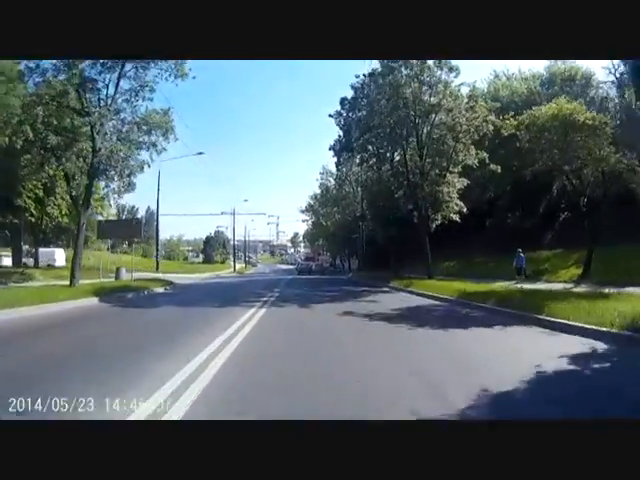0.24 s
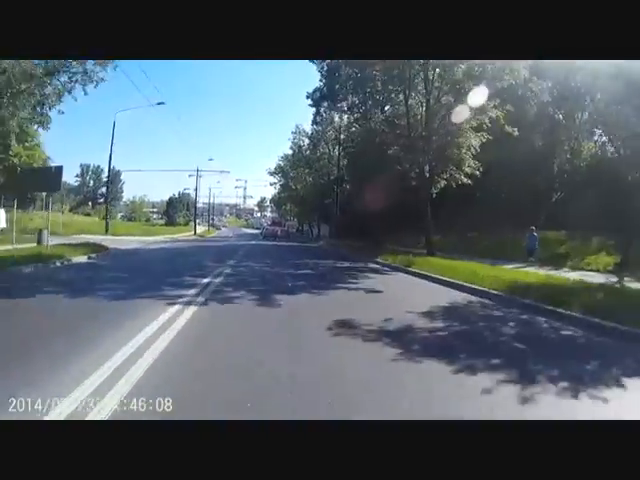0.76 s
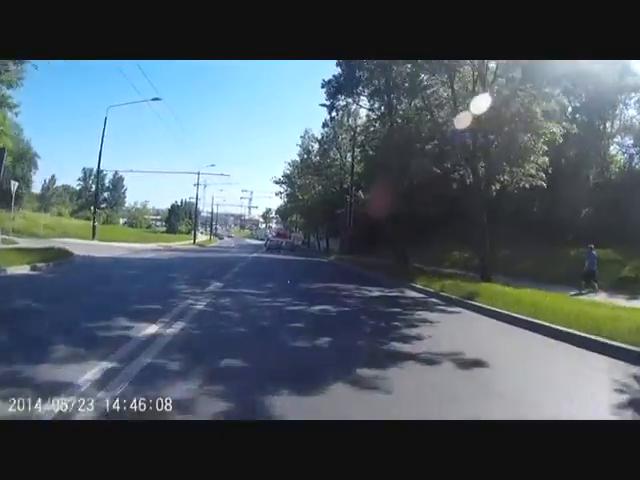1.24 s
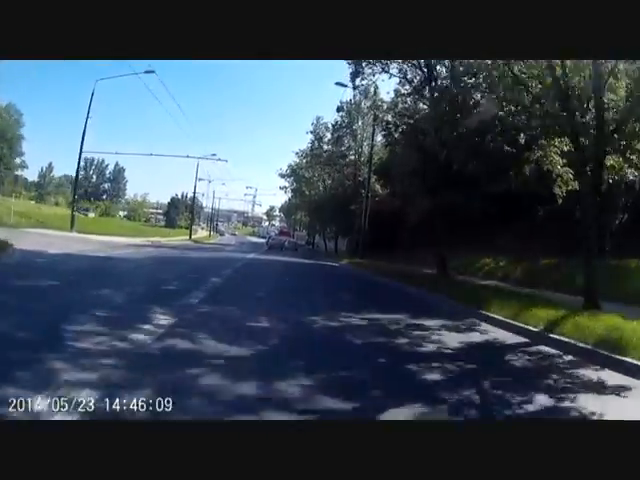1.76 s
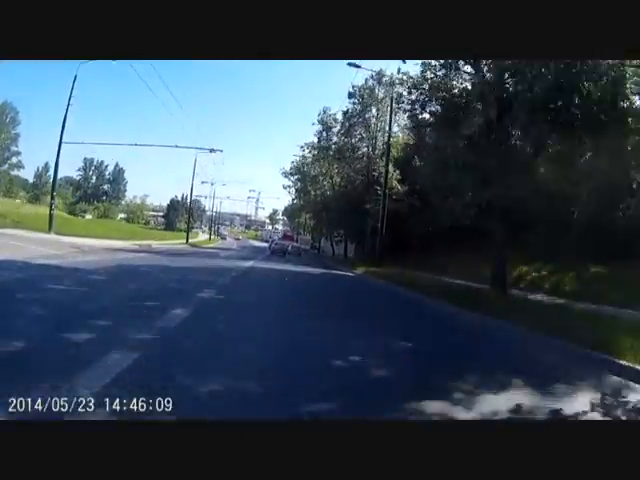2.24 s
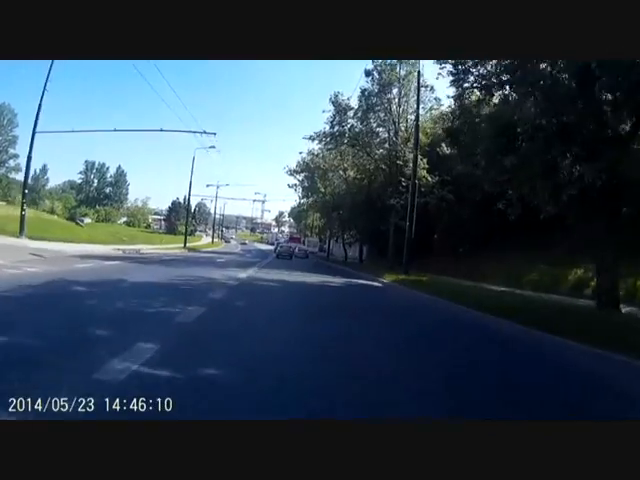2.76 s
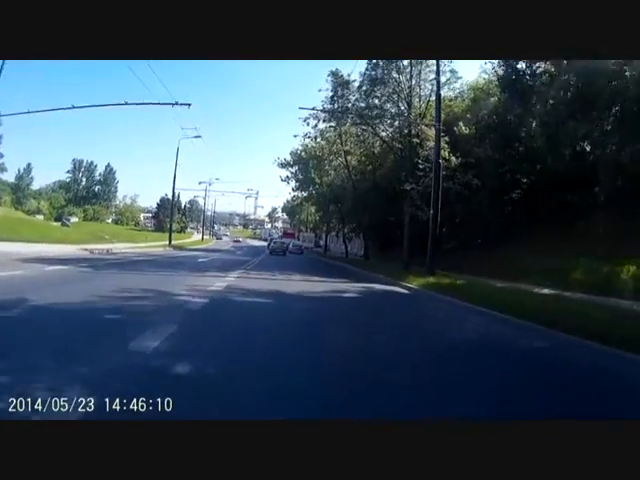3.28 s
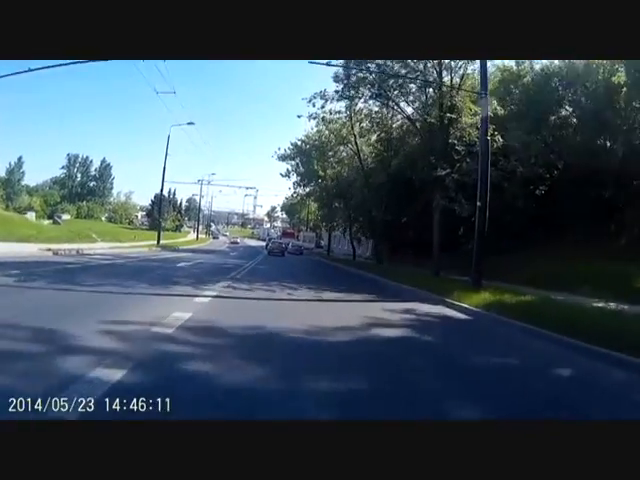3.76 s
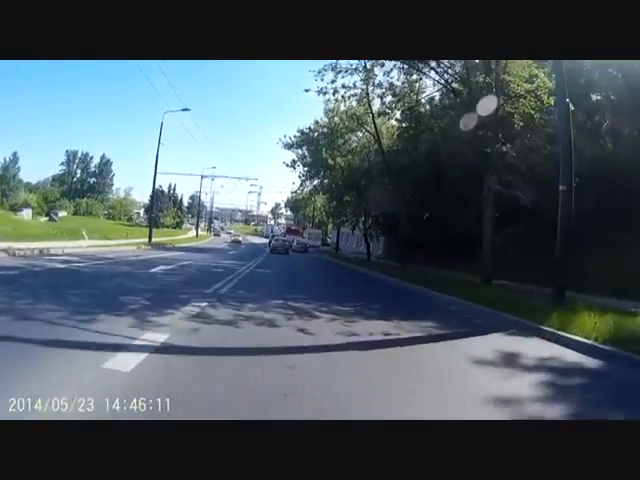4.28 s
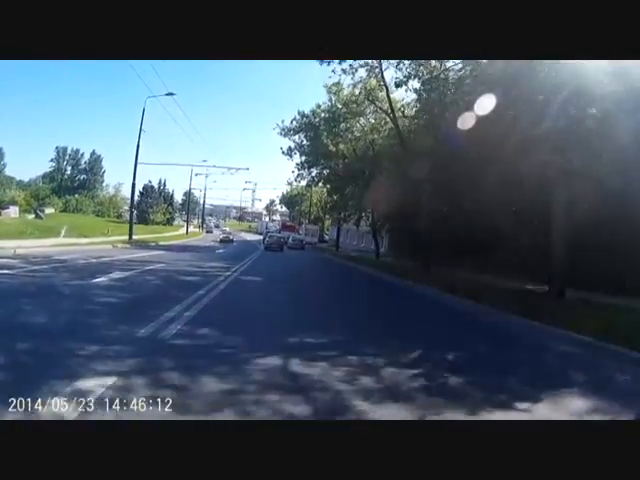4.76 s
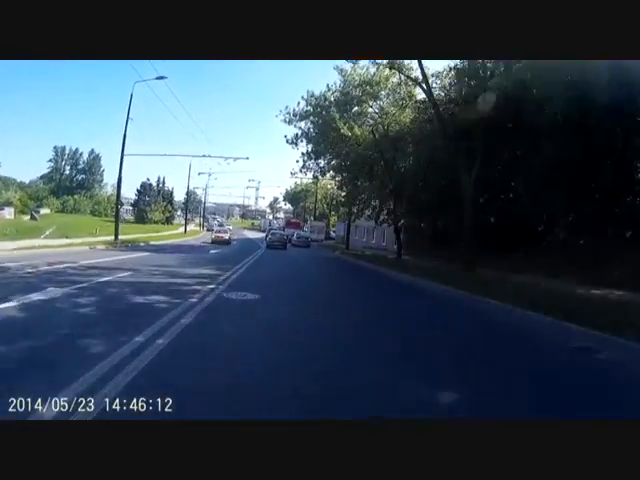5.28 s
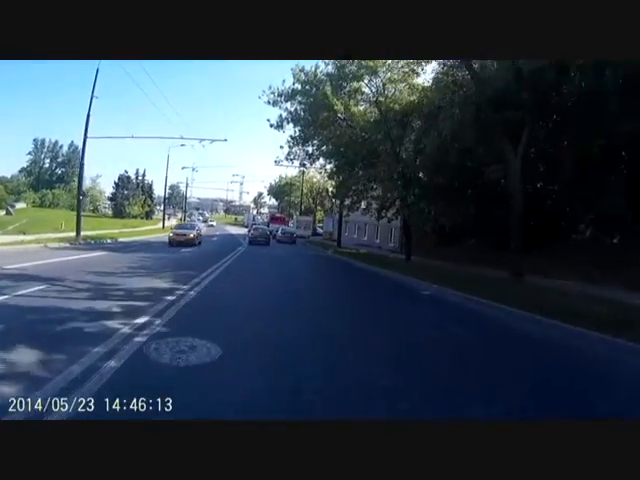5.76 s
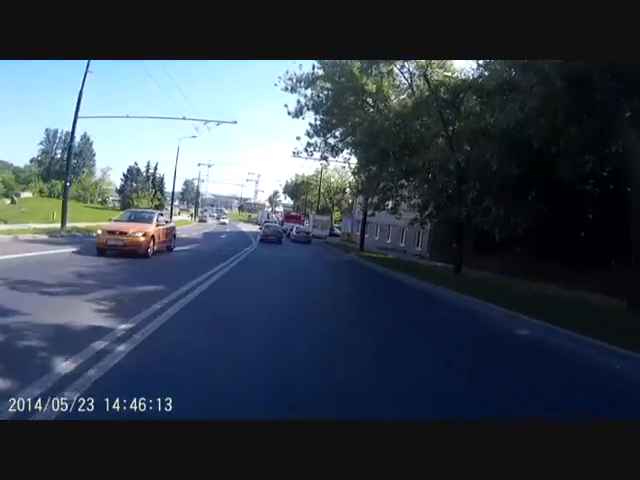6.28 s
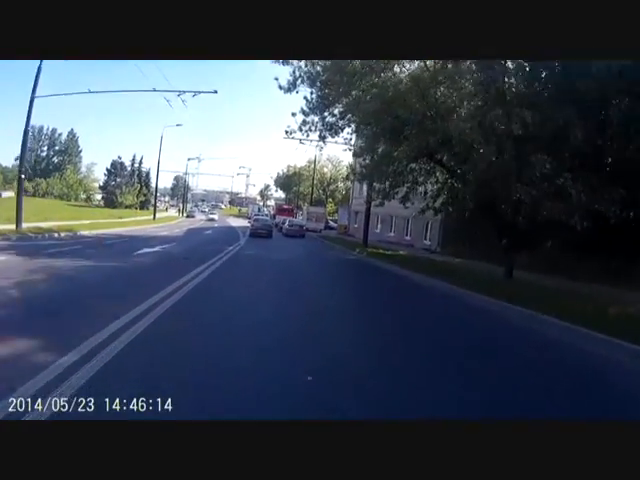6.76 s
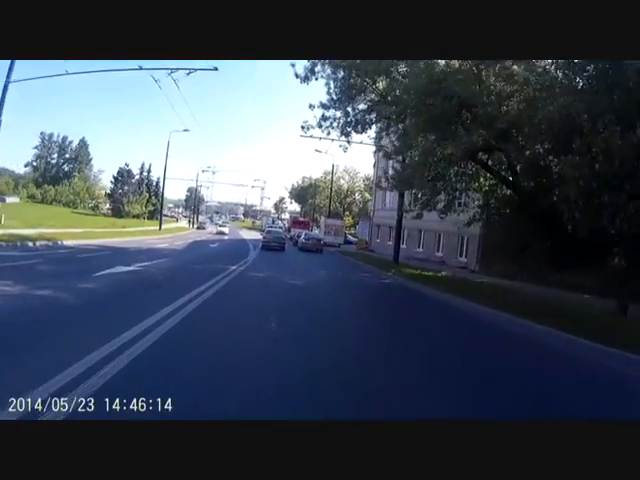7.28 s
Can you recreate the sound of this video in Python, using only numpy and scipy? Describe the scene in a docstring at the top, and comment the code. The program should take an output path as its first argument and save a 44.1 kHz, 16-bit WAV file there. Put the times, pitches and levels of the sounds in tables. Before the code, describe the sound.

Bike-mounted microphone: shrill, rough tyre whine over soft rumble grows louder, with stone pings, a sharp clack and an oncoming car sweeping past.

```python
"""A high hum near 1.5 kHz comes first and swells later: tyres on asphalt ring a camera's hard case on a bicycle.
Contact noise drives the case resonances; stones add decaying pings, and shaped noise gives roar, hiss and rumble.
The frame thumps in short low pulses; loose parts rattle, tick, squeak and give one sharp, modal clack.
Late on, a car passes the other way: hum that follows its distance, with tyre sizzle while alongside.
Two very faint whistles of the camera's electronics run throughout."""
import sys
import numpy as np
from scipy.fft import rfft, irfft, next_fast_len
from scipy.io import wavfile
from scipy.ndimage import map_coordinates

SR = 44100
rng = np.random.default_rng(int(sys.argv[2]) if len(sys.argv) > 2 else 0)


def put_to_file(sound):
    """Save the sound as 16-bit audio at rate SR, in the file named by the first command-line argument."""
    columns = np.atleast_2d(sound).T  # one column per channel
    safe = np.clip(columns, -1, 1)
    whole_steps = np.round(safe * 32767)
    wavfile.write(sys.argv[1], SR, whole_steps.astype(np.int16))


N = 332205

# Drive of the tread by speed and surface: (time [s], strength [dB])
ROLL_STRENGTH = [(0.0, -49), (0.12, -41.5), (0.2, -48), (0.67, -45), (0.83, -51), (1.44, -45.5),
                 (1.51, -39), (1.64, -46.5), (1.94, -39.0), (2.47, -46), (2.59, -38.5), (2.86, -45),
                 (3.32, -39.5), (3.68, -47), (3.79, -39), (4.09, -41.5), (4.15, -33), (4.57, -46.5),
                 (4.88, -34), (4.93, -37.5), (5.24, -30), (6.08, -33.5), (6.73, -30), (7.17, -36),
                 (7.36, -33), (7.53, -36)]
# Main, wall and upper resonances of the case: (centre [Hz], width [Hz], relative level [dB])
CASE_MODES = [(1428, 107, -2.5), (1513, 143, -1.5), (1676, 207, -6)]
WALL_MODES = [(511, 70, -5), (799, 45, 1), (1125, 36, -2.5)]
UPPER_MODES = [(2944, 73, 1.5), (3560, 110, -10), (3890, 240, -13.5), (4410, 470, -15)]
# Filter on the case hum: (frequency [Hz], gain [dB])
HUM_FILTER = [(600, -39), (1000, -5), (1300, -1), (1450, 5), (1780, -2), (2000, -9.5), (2500, -22.5),
              (4000, -46)]
# Spectra of rasp, roar, hiss, deep rumble and frame drumming: (frequency [Hz], relative density [dB per Hz])
RASP_SPECTRUM = [(1200, -32), (2000, -6), (2450, 1), (3200, -3), (4000, -1.5), (4700, -5), (5000, -8.5),
                 (6500, -8), (10000, -40)]
ROAR_SPECTRUM = [(40, -11.5), (100, 0.5), (170, 1), (300, 0), (450, -2.5), (680, -7), (1000, -10),
                 (2000, -13), (4000, -54)]
HISS_SPECTRUM = [(1500, -0.5), (4000, -7.5), (5600, 2), (7000, 1), (8700, 0), (10500, 0), (12400, -0.5),
                 (13200, -0.5), (15000, -4.5), (15800, -7)]
RUMBLE_SPECTRUM = [(8, -24), (20, -4), (29, 0), (36, -4.5), (50, -10.5), (70, -24), (200, -55)]
DRUM_SPECTRUM = [(40, -30), (60, -3), (73, -0.5), (88, -2), (105, -10.5), (130, -19), (300, -43)]
# Coarse stones under the tyre: (time [s], relative level [dB])
STONE_HITS = [(1.929, -23.5), (2.574, -26), (2.9607, -27), (4.344, -27), (5.0866, -24), (5.233, -17),
              (6.2428, -13), (7.013, -13)]
# Slow heaving of the frame: (time [s], deep rumble level [dB])
HEAVE_LEVEL = [(0, -57), (.75, -62), (1.1, -55), (1.9, -45.5), (2.4, -51), (3.6, -53.5), (4.3, -47.5),
               (5.2, -55.5), (6.1, -53), (7.1, -44), (7.53, -48.5)]
# Jolts of the frame, and the low thump of the mount's clack at 6.63 s: (time [s], peak level [dB], frequency
# [Hz], Gaussian sigma [s])
FRAME_BUMPS = [(.288, -35.5, 84.6, 0.0064), (0.347, -31.5, 45.4, 0.0086), (.389, -44, 150, 0.011),
               (6.276, -26, 53, 0.0043), (6.628, -25, 133, 0.0018)]
# Ticks of the mount: (time [s], relative level [dB])
MOUNT_TICKS = [(.178, -40.5), (.422, -29.5), (6.4385, -30)]
# Filter on the ticks: (frequency [Hz], gain [dB])
TICK_FILTER = [(100, -12), (500, 2.5), (1000, 7), (2500, -3), (4000, -5), (5500, -19), (12000, -23),
               (16000, -32)]
# Clack of the mount: (time [s], relative level [dB])
MOUNT_CLACKS = [(6.6281, -9)]
# Modes of the clack: (frequency [Hz], relative level [dB], t60 [s])
CLACK_RESONANCES = [(630, -5, 0.012), (1630, 5.5, 0.017), (2080, -3.5, 0.013), (3230, 1.5, 0.0038),
                    (3740, -6, 0.0039)]
# Rattles of loose parts: (time [s], level at the peak [dB], Gaussian sigma [s])
RATTLE_BURSTS = [(0.184, -48, .004), (0.341, -49, 0.0091), (.392, -49, 0.015), (0.456, -48.5, 0.012),
                 (6.288, -38, 0.0049), (6.438, -40, 0.006)]
# Spectrum of the rattles: (frequency [Hz], relative density [dB per Hz])
RATTLE_SPECTRUM = [(60, -15), (140, 3), (300, -3.5), (560, 0), (750, -2), (1100, -15), (2500, -16),
                   (6000, -36)]
# Sizzle of the passing car's tyres: (centre [Hz], width [Hz], relative level [dB])
SIZZLE_MODES = [(4550, 260, 7), (7400, 490, 4), (9900, 550, 2), (11400, 600, -2), (13100, 500, -4)]
# Hiss limits, before road patches shift it: (lowest level [dB], highest level [dB])
HISS_LIMITS_DB = (-69.5, -60.5)

TOP_HZ = 15800
CRUISE_DB = -40
# Base levels at cruising strength
HUM_DB, WALLS_DB, RASP_DB, ROAR_DB, HISS_DB, DRUM_DB = -43.5, -56, -58, -54.5, -66.5, -56.5
# Layer gain per gain of strength [dB per dB]
HUM_DB_PER_DB, WALLS_DB_PER_DB, RASP_DB_PER_DB = 1.065, 0.78, 0.94
ROAR_DB_PER_DB, HISS_DB_PER_DB, DRUM_DB_PER_DB = 0.42, 0.65, 0.18
# Car: time alongside, nearest distance, closing speed, hum level alongside
CAR_S, CAR_GAP_M, CAR_M_PER_S, CAR_DB = 6.73, 5.03, 21.5, -28


def tyres(surface_db):
    """Tread on coarse asphalt rings the case: a high hum with a rasp above it."""
    hum = amp(HUM_DB + effort_db(HUM_DB_PER_DB)) * case_hum()
    walls = amp(WALLS_DB + effort_db(WALLS_DB_PER_DB)) * ringing(WALL_MODES, spread_db=2)
    rasp_db = RASP_DB + effort_db(RASP_DB_PER_DB)
    rasp = amp(rasp_db - 1.0) * ringing(UPPER_MODES, spread_db=2.8)
    rasp += amp(rasp_db - 4.0) * noise(RASP_SPECTRUM)
    return amp(surface_db) * (hum + walls + lowpass(rasp, 5600))


def case_hum():
    """Contact noise through the main resonances of the case; rms 1."""
    return unit(coloured(ringing(CASE_MODES, spread_db=1.5), HUM_FILTER))


def effort_db(db_per_db):
    """Layer gain relative to cruising, following the rolling strength."""
    strength_db, = curves(ROLL_STRENGTH)
    return db_per_db * (strength_db - CRUISE_DB)


def stones(hz=1500, t60_s=0.03, attack_s=0.00082):
    """A coarse stone kicks the main resonance of the case into a brief ping."""
    out = np.zeros(N + SR)
    t = np.arange(SR // 10) / SR
    for s, db in STONE_HITS:
        decay = amp(db - 3.0 - 60 * t / t60_s)
        ping = decay * (1 - np.exp(-t / attack_s)) * np.sin(2 * np.pi * hz * t)
        out[round(s * SR):][:len(t)] += ping
    return out[:N]


def rush(surface_db, sway_db=1.0):
    """Dull road roar and thin air hiss swell with the tyres, but less steeply."""
    roar_db = ROAR_DB + effort_db(ROAR_DB_PER_DB) + 0.57 * surface_db + sway_db * wobble(11)
    hiss_db = np.clip(HISS_DB + effort_db(HISS_DB_PER_DB), *HISS_LIMITS_DB) + 0.67 * surface_db
    return amp(roar_db) * noise(ROAR_SPECTRUM) + amp(hiss_db) * noise(HISS_SPECTRUM)


def frame():
    """The frame rumbles and drums all the way; each bump gives it a soft low push, and the mount's clack a low
    thump."""
    rumble_db, = curves(HEAVE_LEVEL)
    out = amp(rumble_db) * noise(RUMBLE_SPECTRUM)
    out += amp(DRUM_DB + effort_db(DRUM_DB_PER_DB)) * noise(DRUM_SPECTRUM)
    for s, db, hz, sigma_s in FRAME_BUMPS:
        out -= amp(db) * bell(s, sigma_s) * np.cos(2 * np.pi * hz * (clock() - s))
    return out


def passing_car(span_s=0.14, sizzle_db=-60):
    """Car tyres ring the case, fading with distance; their sizzle is heard only near the closest point."""
    t = clock() - CAR_S
    nearness = CAR_GAP_M / np.hypot(CAR_GAP_M, CAR_M_PER_S * t)
    alongside = 1 / (1 + (t / span_s) ** 8)
    hum = amp(CAR_DB) * nearness * case_hum()
    sizzle = amp(sizzle_db) * alongside * ringing(SIZZLE_MODES, spread_db=3)
    return hum + sizzle


def mount(settle=0.085):
    """Play in the mount: dry ticks of decaying noise and one hard clack of decaying modes."""
    ticks, clacks = np.zeros(N + SR), np.zeros(N + SR)
    t = np.arange(SR // 8) / SR
    for s, db in MOUNT_TICKS:
        decay = amp(db + 3.0 - 60 * t / 0.015)  # t60 15 ms
        ticks[round(s * SR):][:len(t)] += decay * rng.standard_normal(len(t))
    ring = np.zeros(len(t))
    for hz, db, t60_s in CLACK_RESONANCES:
        # longer-ringing modes build up more slowly
        attack = 1 - np.exp(-t / (settle * t60_s))
        ring += amp(db - 60 * t / t60_s) * attack * np.sin(2 * np.pi * hz * t)
    for s, db in MOUNT_CLACKS:
        clacks[round(s * SR):][:len(t)] += amp(db + 3) * ring
    return coloured(ticks[:N], TICK_FILTER) + lowpass(clacks[:N], 5500)


def rattles():
    """Loose parts of the bicycle chatter in short bursts of noise."""
    envelope = sum(amp(db) * bell(s, sigma_s) for s, db, sigma_s in RATTLE_BURSTS)
    return noise(RATTLE_SPECTRUM) * envelope


def squeak(s=0.13, sigma_s=0.003, db=-50):
    """One tiny, rough chirp of a rubbing part, its pitch wavering."""
    pitch_hz = 3480 + 170 * wobble(400)
    return amp(db) * bell(s, sigma_s) * tone(pitch_hz)


def whine(low_hz=9483, high_hz=9555, db=-87):
    """Two very faint, slightly unsteady whistles of the camera's electronics."""
    return amp(db) * sum(tone(hz + 2.5 * wobble(5)) for hz in (low_hz, high_hz))


def ringing(modes, spread_db):
    """Resonances, each shaken by its own stream of contacts; rms 1."""
    total = np.zeros(N)
    for centre_hz, width_hz, db in modes:
        def response(f):
            damping = 1j * f * width_hz
            return amp(db) * damping / (centre_hz * centre_hz - f * f + damping)
        total += filtered(grit(spread_db), response)
    return unit(total)


def grit(spread_db):
    """Contacts of tread and stones: noise whose strength varies every few milliseconds."""
    return rng.standard_normal(N) * amp(spread_db * wobble(350))


def noise(points):
    """Coloured noise of rms 1."""
    return unit(coloured(rng.standard_normal(N), points))


def coloured(x, points):
    """Filter by (frequency [Hz], gain [dB]) points on a log frequency axis."""
    f, db = np.transpose(points)
    return filtered(x, lambda hz: amp(np.interp(np.log(hz + 1), np.log(f), db)))


def lowpass(x, corner_hz):
    """Steep, smooth treble loss above the corner."""
    return filtered(x, lambda hz: 1 / (1 + (hz / corner_hz) ** 8))


def filtered(x, response):
    """Multiply the zero-padded spectrum by a response of frequency."""
    m = next_fast_len(N + SR // 2)
    return irfft(rfft(x, m) * response(np.fft.rfftfreq(m, 1 / SR)), m)[:N]


def tone(hz):
    """Sine that follows a frequency curve."""
    return np.sin(2 * np.pi * np.cumsum(hz) / SR)


def bell(s, sigma_s):
    """Gaussian pulse of height 1."""
    return np.exp(-0.5 * ((clock() - s) / sigma_s) ** 2)


def wobble(knots_per_s):
    """Smooth random curve."""
    knots = rng.standard_normal(int(N * knots_per_s / SR) + 4)
    return map_coordinates(knots, [clock() * knots_per_s])


def curves(rows):
    """One value per sample for each column after the time."""
    s, *cols = np.transpose(rows)
    return [np.interp(clock(), s, c) for c in cols]


def clock():
    """Time of every sample [s]."""
    return np.arange(N) / SR


def unit(x):
    """Scale to rms 1."""
    return x / np.sqrt(np.mean(x ** 2) + 1e-20)


def amp(db):
    """Decibels to gain."""
    return 10 ** (np.asarray(db) / 20)


def scene(patchy_db=1.23):
    """Sum of all that reaches the one microphone."""
    surface_db = patchy_db * wobble(18)  # rougher and smoother road patches
    rolling = tyres(surface_db) + stones() + rush(surface_db) + frame()
    loose_parts = rattles() + mount() + squeak()
    return (rolling + loose_parts + passing_car() + whine())[None]


def record(dry):
    """The camera keeps nothing above its band limit."""
    return np.array([filtered(x, lambda hz: hz < TOP_HZ) for x in dry])


dry = scene()
out = record(dry)
put_to_file(out)
```